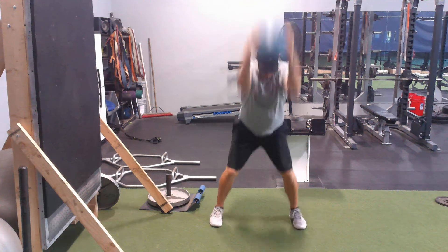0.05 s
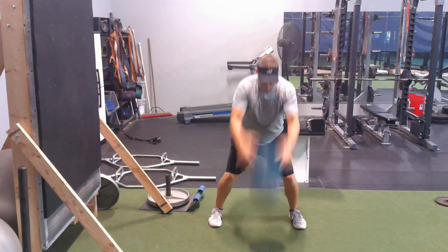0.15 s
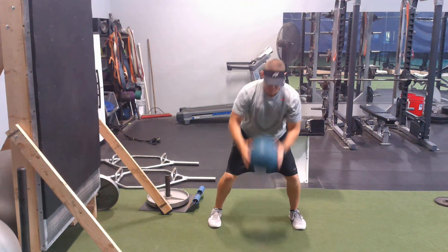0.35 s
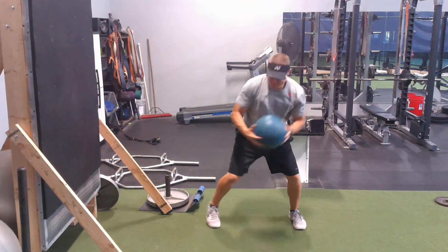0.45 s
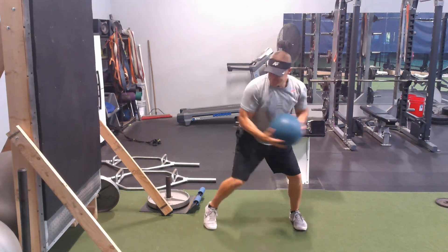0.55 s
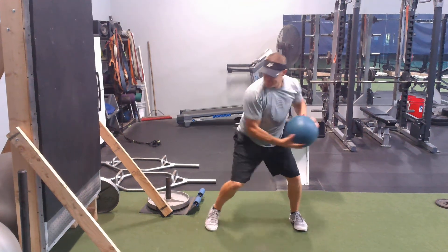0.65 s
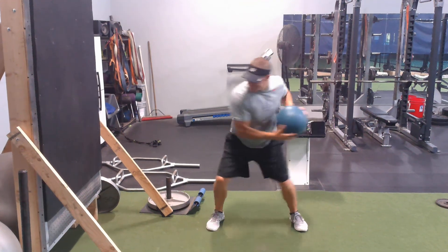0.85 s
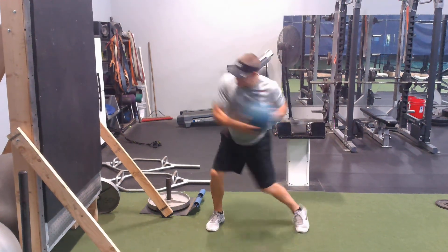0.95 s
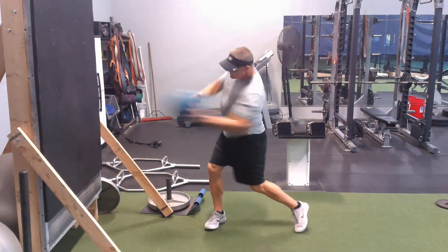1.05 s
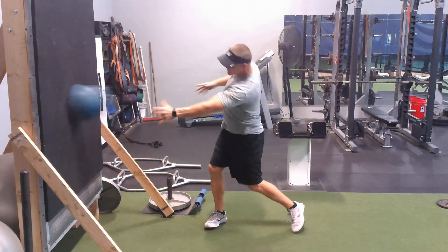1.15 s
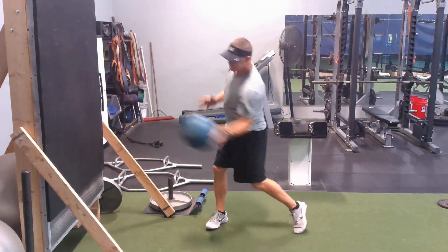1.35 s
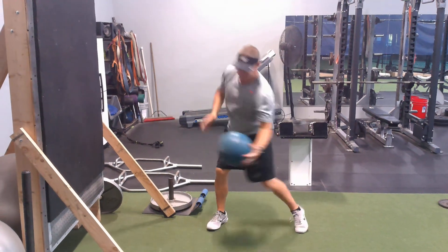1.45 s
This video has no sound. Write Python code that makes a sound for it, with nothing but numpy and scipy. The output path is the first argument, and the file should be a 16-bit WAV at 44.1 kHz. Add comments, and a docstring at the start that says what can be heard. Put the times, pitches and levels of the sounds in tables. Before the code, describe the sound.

Deep hollow ball slam booming in a gym hall, then a hard cracking slap against a rattling board

```python
"""Over the hiss of ventilation and swishing clothes, feet press on a gym floor: soft damped floor modes.
A heavy medicine ball slams down: ball and floor modes boom and knock under noise slaps of its skin.
The hall tail and far-wall echoes hold the boom; caught on the rebound, the ball rings softly again.
Thrown against a wooden board, it cracks and slaps in noise bursts; the board's modes ring and it rattles.
A limiter and a soft clipper round off the loud blows."""
import sys
import numpy as np
from scipy import signal
from scipy.fft import rfft, irfft, next_fast_len
from scipy.io import wavfile
from scipy.ndimage import uniform_filter1d, minimum_filter1d

SR = 44100
rng = np.random.default_rng(int(sys.argv[2]) if len(sys.argv) > 2 else 0)


def wav_out(sig):
    """Save sig, one row per channel (or a flat mono array), as 16-bit PCM at SR to the path in sys.argv[1]."""
    wavfile.write(sys.argv[1], SR, np.round(np.clip(np.atleast_2d(sig).T, -1, 1) * 32767).astype(np.int16))


N = 66150

# The ball squashes on the floor, then springs off it. Each row: start in seconds, then levels in dB of
# the ball's boom, the push into the floor, the skin slap and the hollow knock.
FLOOR_IMPACTS = [(0.2473, -4.5, 0.5, -17.5, -14.5), (0.277, -5.5, -24.5, -20.5, -0.5)]
# Air and shell of the ball. Each row: frequency in Hz, level in dB, t60 in seconds.
BALL_MODES = [(172.1, -10.5, 0.35), (173, -21, 0.11), (210.9, -2, 0.27), (237.5, -10, 0.15),
              (282, -9, 0.39), (387, -20, 0.43)]
# The floor gives under a load. Each row: frequency in Hz, level in dB, t60 in seconds.
FLOOR_MODES = [(37.6, -33, 0.84), (52.3, 4, 0.098), (68.6, -12.5, 0.48), (89.3, -8, 0.34)]
BOOM_ATTACK_S, PUSH_ATTACK_S = 0.0015, 0.0044


def amp(db):
    """Linear gain of a level in dB."""
    return 10 ** (np.asarray(db) / 20)


def unit(x):
    """x scaled to an rms of 1 over all channels."""
    return x / np.sqrt(np.mean(x ** 2) + 1e-20)


def along(points, hz):
    """Curve through (Hz, value) points on a log frequency axis."""
    f, v = np.transpose(points)
    return np.interp(np.log(hz + 1), np.log(f + 1), v)


def since(s):
    """Seconds after s, zero before."""
    return np.maximum(np.arange(N) / SR - s, 0)


def filtered(x, response):
    """x shaped by a response of frequency, with zero padding against wrap-around."""
    m = next_fast_len(N + SR // 2)
    return irfft(rfft(x, m) * response(np.fft.rfftfreq(m, 1 / SR)), m)[..., :N]


def pan(x, db):
    """Left channel up and right channel down by db."""
    return x * amp([[db], [-db]])


def noise(spectrum):
    """Coloured stereo noise of rms 1, near mono in the bass, mixed from independent mid and side."""
    # Each row: frequency in Hz, left-right likeness (1 is mono).
    likeness = [(100, 1), (250, 0.99), (500, 0.63), (1000, 0.67), (2000, 0.19), (4000, 0.1), (12000, 0.083)]

    def mid_side_response(hz):
        turn = np.arccos(np.clip(along(likeness, hz), -1, 1)) / 2
        return amp(along(spectrum, hz)) * [np.cos(turn), np.sin(turn)]

    mid, side = filtered(rng.standard_normal((2, N)), mid_side_response)
    return unit(np.array([mid + side, mid - side]))


def dying(spectrum, t60, size=256):
    """Noise in which each frequency dies at its own speed."""
    hz, t, bins = signal.stft(noise(spectrum), SR, nperseg=size)
    decay = amp(-60 * t / along(t60, hz)[:, None])
    return signal.istft(bins * decay, SR, nperseg=size)[1][:, :N]


def burst(s, spectrum, t60):
    """A dense, dying rush of noise that starts at s."""
    late = np.pad(dying(spectrum, t60), ((0, 0), (round(s * SR), 0)))[:, :N]
    return late * (1 - np.exp(-since(s) / 0.00023))  # attack in seconds


def ring(s, modes, attack):
    """Damped modes pushed inwards at s, their levels scattered at random by about a dB."""
    t = since(s)
    total = 0
    for hz, db, t60 in modes:
        level = db + rng.normal()
        total = total + amp(level - 60 * t / t60) * np.sin(2 * np.pi * hz * t)
    return -(1 - np.exp(-t / attack)) * total


def in_hall(x, wet_db):
    """A sound and the hall's answer, a noise tail that lasts longest in the low boom."""
    # Each row: frequency in Hz, t60 in seconds.
    hall_decay = [(40, 0.55), (100, 0.47), (150, 1.33), (205, 1.32), (280, 0.97), (700, 0.78), (2000, 0.68),
                  (10000, 0.42)]
    # Each row: frequency in Hz, relative level in dB.
    hall_colour = [(40, 1.5), (110, -3.5), (160, -0.5), (205, -1.5), (300, -3.5), (1000, -2.5), (10000, 1)]
    build_s = 0.01
    tail = dying(hall_colour, hall_decay, size=1024) * (1 - np.exp(-since(0) / build_s))
    tail = tail / np.linalg.norm(tail[0])  # left channel to unit energy
    return x + amp(wet_db) * signal.fftconvolve(x, tail, axes=1)[:, :N]


def background():
    """Steady ventilation noise, and a noise swish of clothes and shoes that swells with each movement."""
    # Ventilation. Each row: frequency in Hz, relative level in dB per Hz.
    vent_colour = [(15, -46), (25, 1), (59, -4.5), (91, -13), (104, -1.5), (164, -0.5), (267, -5),
                   (289, -17), (368, -7.5), (457, -15.5), (614, -6.5), (1450, -9.5), (1620, -8.5),
                   (1900, -9), (15500, -29)]
    # Swish of clothes and shoes. Each row: time in seconds, level in dB.
    swish_levels = [(0.122, -43), (0.201, -37.5), (.27, -41), (.34, -35), (.48, -40), (.57, -51),
                    (.85, -95), (1.0, -39), (1.12, -49), (1.219, -30.5), (1.328, -41), (1.42, -34.5),
                    (1.5, -44)]
    # Cloth. Each row: frequency in Hz, relative level in dB per Hz.
    cloth_colour = [(100, 14), (1000, 2), (3000, 4.5), (6000, 3), (9000, -3), (14000, 1)]
    vent_db, pan_db = -34.5, -1.42  # negative pan leans right
    swish = amp(np.interp(since(0), *np.transpose(swish_levels))) * noise(cloth_colour)
    return pan(amp(vent_db) * noise(vent_colour) + swish, pan_db)


def feet_press():
    """Feet load the floor before the slam and set its damped modes moving."""
    # Each row: start in seconds, level in dB.
    steps = [(0.123, -31)]
    return sum(amp(db) * ring(s, FLOOR_MODES, PUSH_ATTACK_S) for s, db in steps)


def skin_snap():
    """The skin snaps crisply at first touch, a short noise burst."""
    # Each row: start in seconds, level in dB.
    snaps = [(0.2472, -20)]
    # Each row: frequency in Hz, relative level in dB per Hz.
    snap_colour = [(300, -10), (950, 16), (1300, 0), (2000, -3), (4000, -1), (8000, -12), (15000, -5)]
    # Each row: frequency in Hz, t60 in seconds.
    snap_decay = [(1000, 0.12), (10000, 0.042)]
    return sum(amp(db) * burst(s, snap_colour, snap_decay) for s, db in snaps)


def ball_boom():
    """Squashing and springing off, the ball rings in the modes of its air and shell."""
    return sum(amp(db) * ring(s, BALL_MODES, BOOM_ATTACK_S) for s, db, *_ in FLOOR_IMPACTS)


def floor_contact():
    """The floor gives in low modes, the skin slaps as noise and the dented shell knocks in short modes."""
    # Skin slap. Each row: frequency in Hz, relative level in dB per Hz.
    skin_colour = [(60, -9), (250, -3), (450, -9.5), (1000, -5.5), (1600, -10.5), (3000, -21.5),
                   (8000, -39), (15000, -39)]
    # Skin slap. Each row: frequency in Hz, t60 in seconds.
    skin_decay = [(100, 0.2), (1000, 0.18), (8000, 0.063)]
    # Hollow knock of the dented shell. Each row: frequency in Hz, level in dB, t60 in seconds.
    dent_modes = [(200.2, 5, 0.08), (272, -6, 0.04), (472, -23, 0.046), (580, -20, 0.05)]
    total = 0
    for s, _, push_db, slap_db, knock_db in FLOOR_IMPACTS:
        push = amp(push_db) * ring(s, FLOOR_MODES, PUSH_ATTACK_S)
        slap = amp(slap_db) * burst(s, skin_colour, skin_decay)
        knock = amp(knock_db) * ring(s, dent_modes, BOOM_ATTACK_S)
        total = total + push + slap + knock
    return total


def with_echoes(x):
    """A sound and its dull returns from the far walls: delayed, low-passed copies."""
    # Each row: delay in seconds, level in dB.
    wall_returns = [(0.204, -16), (.275, -14.5), (0.334, -16), (.4, -28.5), (.49, -46)]
    top_hz = 263

    def walls(hz):
        returns = sum(amp(db) * np.exp(-2j * np.pi * hz * delay) for delay, db in wall_returns)
        return returns / (1 + (hz / top_hz) ** 6)

    return x + filtered(x, walls)


def catch():
    """Hands close on the rebounding ball and ring its modes softly again."""
    # Each row: start in seconds, level in dB.
    catches = [(.538, -26)]
    return sum(amp(db) * ring(s, BALL_MODES, BOOM_ATTACK_S) for s, db in catches)


def floor_slam():
    """Feet, slam and catch excite one hall together; only the boom echoes off the far walls."""
    dry_slam = with_echoes(ball_boom()) + floor_contact() + skin_snap() + catch() + feet_press()
    return in_hall(dry_slam, -8.5)  # hall level in dB


def board_blow():
    """The ball meets the board: noise crack and slap over the damped modes of board and frame."""
    # Board and frame. Each row: frequency in Hz, level in dB, t60 in seconds.
    board_modes = [(36.5, -6, 0.66), (67.5, -4, 0.17), (164.2, -9, 0.42), (201, -6.5, 0.41),
                   (319.6, -9, 0.31), (404.3, 6, 0.084), (576, 5, 0.051), (678.5, -4.5, 0.22),
                   (716.4, 5.5, 0.092), (782, -5, 0.13), (845, 4.5, 0.046), (1012, -1, 0.069),
                   (1086, -10, 0.1)]
    # Slap, then crack. Each row: frequency in Hz, relative level in dB per Hz.
    slap_colour = [(40, -5), (250, -1.5), (700, -2), (1100, -17.5), (1400, -13), (2200, -19), (3000, -27),
                   (6000, -29), (15000, -33.5)]
    crack_colour = [(100, -2.5), (1050, 3), (1400, -7), (2200, -5.5), (3000, -19), (8000, -22.5),
                    (15000, -31)]
    # Slap, then crack. Each row: frequency in Hz, t60 in seconds.
    slap_decay = [(100, 0.29), (700, 0.09), (2000, 0.42), (10000, 0.16)]
    crack_decay = [(100, 0.059), (8000, 0.034)]
    start_s, attack_s = 1.1838, 0.003
    ring_db, slap_db, crack_db = -10, -11, -6
    ringing = amp(ring_db) * ring(start_s, board_modes, attack_s)
    slap = amp(slap_db) * burst(start_s, slap_colour, slap_decay)
    crack = amp(crack_db) * burst(start_s, crack_colour, crack_decay)
    return ringing + slap + crack


def board_rattle():
    """The board knocks back on its frame in a string of dull noise bursts."""
    # Each row: start in seconds, level in dB.
    rattles = [(1.223, -19.5), (1.266, -19), (1.281, -26), (1.322, -25.5), (1.381, -27), (1.426, -28),
               (1.468, -27.5)]
    # Each row: frequency in Hz, relative level in dB per Hz.
    knock_colour = [(30, 3.5), (80, 1.5), (220, 1.5), (400, -2), (700, -6.5), (1500, -13), (3000, -32),
                    (15000, -56)]
    # Each row: frequency in Hz, t60 in seconds.
    knock_decay = [(100, 0.23), (2000, 0.22), (10000, 0.032)]
    return sum(amp(db) * burst(s, knock_colour, knock_decay) for s, db in rattles)


def board_throw():
    """Blow and rattle ring in the hall, panned by frequency."""
    # Each row: frequency in Hz, left up and right down in dB.
    board_pan = [(100, -0.5), (270, 0.3), (500, -0.5), (1000, -1), (4000, -1.5), (12000, -3)]
    wet = in_hall(board_blow() + board_rattle(), -10.5)  # hall level in dB
    return filtered(wet, lambda hz: amp(np.outer([1, -1], along(board_pan, hz))))


def scene():
    """All layers, the left channel lagging slightly behind the right."""
    left_lag_s = 9e-5
    lag = np.array([[left_lag_s / 2], [-left_lag_s / 2]])
    mix = background() + floor_slam() + board_throw()
    return filtered(mix, lambda hz: np.exp(-2j * np.pi * hz * lag))


def record(dry):
    """Sound opens after a silent start; a limiter dips just after peaks, a soft clip rounds, the top is cut."""
    limit_db, hold_s = 3.5, 0.02
    clip_top, hardness = 0.99, 9.6
    start_s, top_hz = 0.12, 15800
    hold = max(int(hold_s * SR), 3)
    back = (hold - 1) // 2  # both windows look backwards, so peaks slip through first
    needed = np.minimum(1, amp(limit_db) / (np.abs(dry).max(axis=0) + 1e-9))
    held = minimum_filter1d(needed, hold, origin=back)
    limited = dry * uniform_filter1d(held, hold, origin=back)
    clipped = limited / (1 + np.abs(limited / clip_top) ** hardness) ** (1 / hardness)
    return filtered(clipped * (since(start_s) > 0), lambda hz: hz < top_hz)


dry = scene()
out = record(dry)
wav_out(out)
```